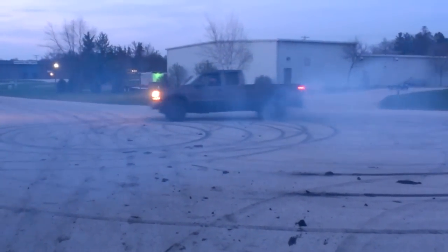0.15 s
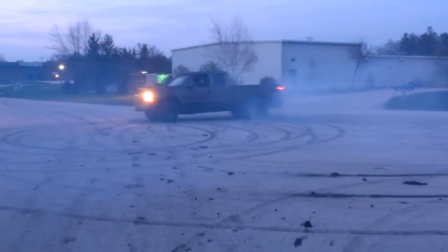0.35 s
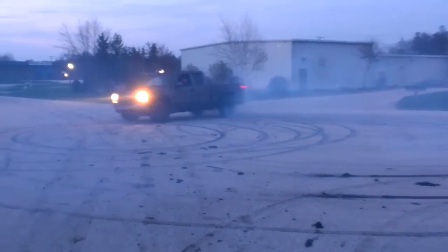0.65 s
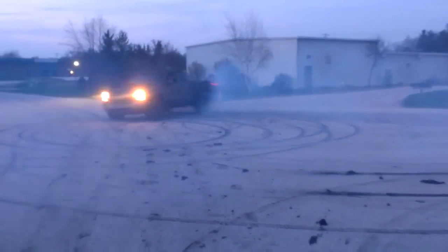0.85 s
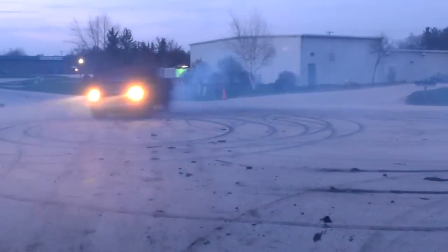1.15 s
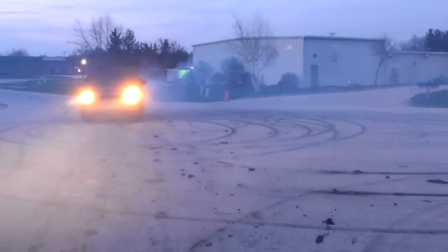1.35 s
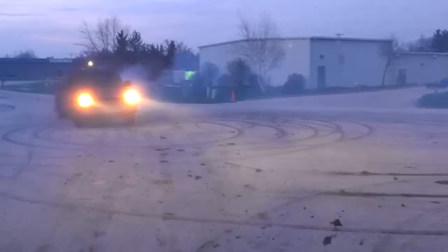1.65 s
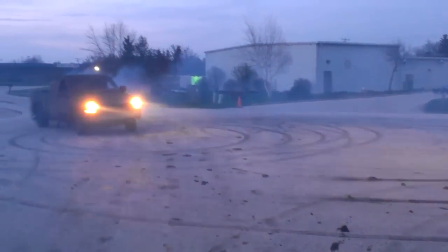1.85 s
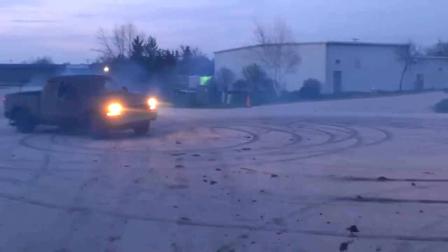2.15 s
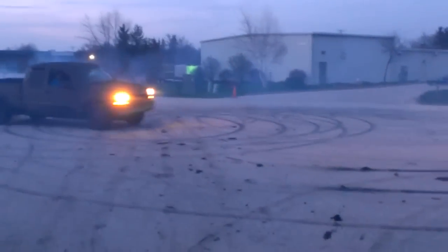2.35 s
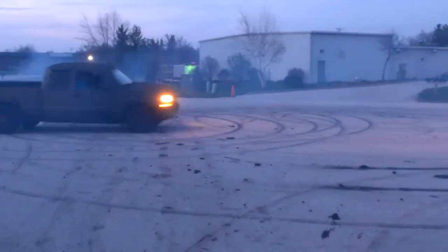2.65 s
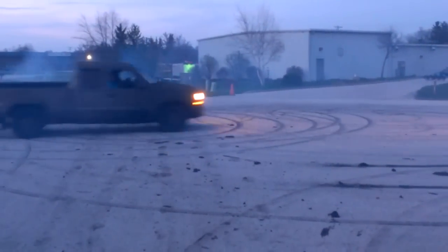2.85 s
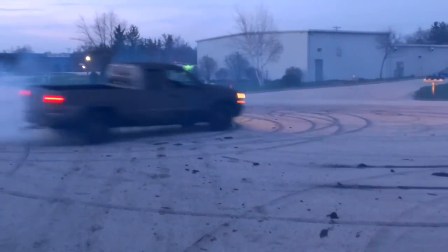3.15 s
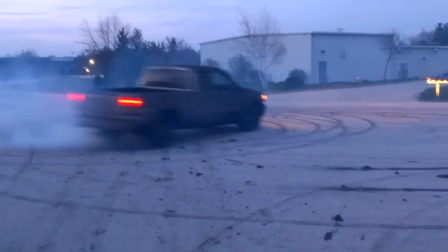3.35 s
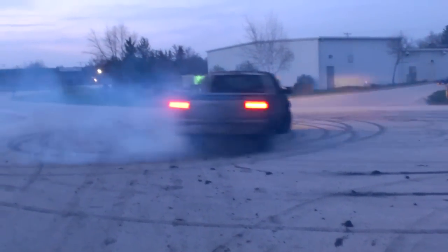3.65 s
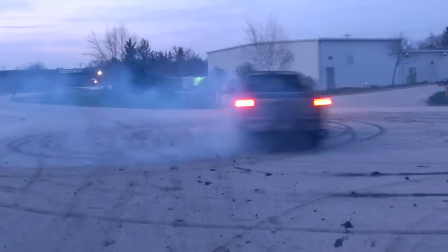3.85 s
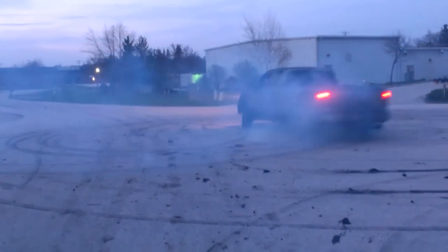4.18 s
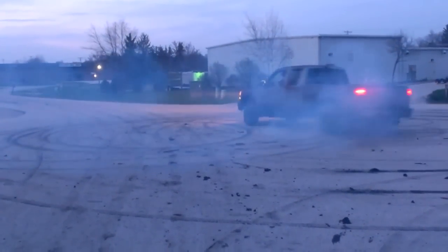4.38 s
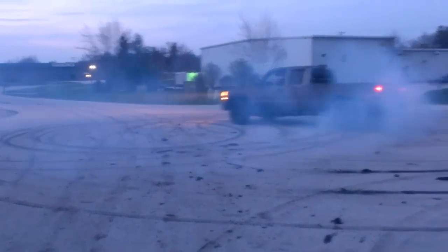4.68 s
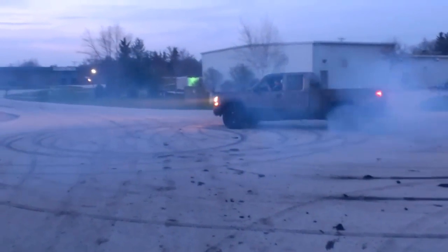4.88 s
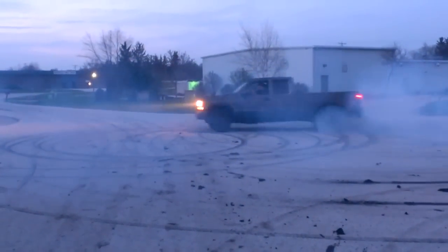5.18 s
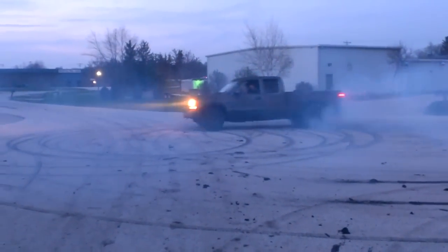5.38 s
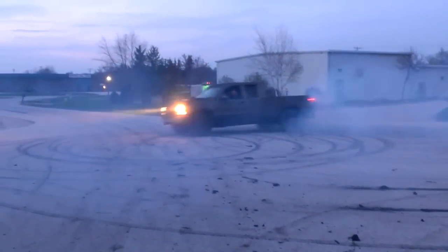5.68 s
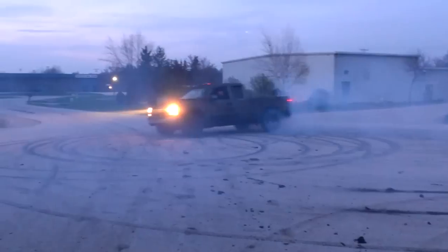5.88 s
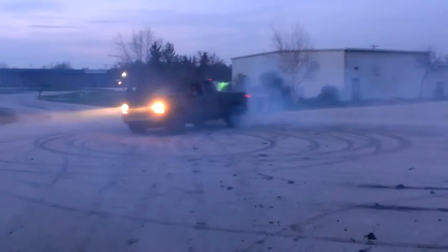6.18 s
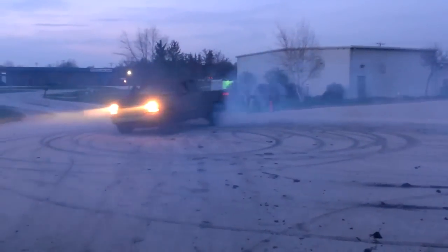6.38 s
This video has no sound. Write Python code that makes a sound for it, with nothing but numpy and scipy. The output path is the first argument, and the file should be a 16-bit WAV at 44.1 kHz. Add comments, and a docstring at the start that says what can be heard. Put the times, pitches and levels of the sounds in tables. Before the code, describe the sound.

A pickup truck circles on a concrete lot, tyres squealing continuously in wavering, chattering tones over a high-revving engine, with short shrieks and rasping rubber.

```python
"""The rear tyres of a V8 pickup squeal as it circles on a concrete lot: stick-slip in three wavering modes,
now singing, now chattering, with short shrieks above them. Scrubbed rubber adds rasp, grind and grit
as shaped noise. The engine holds high revs as harmonics of its cycle rate, with rumble, roar and
a fan whose hiss grows as the nose sweeps past. Wind bumps a two-port microphone with a limiter."""
import sys
import numpy as np
from scipy import signal
from scipy.fft import rfft, irfft, next_fast_len
from scipy.io import wavfile
from scipy.ndimage import uniform_filter1d, minimum_filter1d

SR = 44100
rng = np.random.default_rng(int(sys.argv[2]) if len(sys.argv) > 2 else 0)


def pcm_store(signal):
    """Save signal as 16-bit PCM."""
    levels = np.round(np.clip(np.atleast_2d(signal), -1, 1) * 32767)
    wavfile.write(sys.argv[1], SR, levels.astype(np.int16).T)


N = 287973

# All levels are relative: later trims, beams and the microphone act on them.
# the circle: time of one lap; moments nearest the listener, nose towards the listener, tail
# (rear tyres and tailpipe) towards the listener, and furthest left
LAP_S, NEAREST_S, NOSE_S, TAIL_S, LEFTMOST_S = 5.1, 2.85, 2.424, 4.04, 2.5
CENTRE_M, RADIUS_M = 11.46, 4.8  # distance of the circle's centre from the listener; its radius
PAN_DB, PAN_CENTRE_DB = 2.06, 1.38  # left minus right: swing about the mean, and the mean

# stick-slip modes of the tread: (f/Hz, chatter width/Hz, pitch waver at full chatter [share], level/dB,
# gain per squeal [dB/dB], near-side gain/dB, overtone level/dB, chatter share [0-1])
TREAD_MODES = [(652, 44, .025, -18.5, 1.49, 0.5, 2, .35), (718, 40, .02, -16, 1.66, 4, 1, 0.53),
               (841.2, 45, .03, -15, 0.98, 0.7, -9, 0.7)]
# effort of the squeal: (t/s, level/dB about its usual level)
SQUEAL_EFFORT = [(0, -2.5), (.25, 2.5), (.85, -2), (1.25, -2.5), (1.48, -6), (1.7, -2.5), (2.3, -3.5),
                 (2.85, -0.5), (3.25, 1.5), (3.95, 0), (4.2, 0), (4.7, 2.5), (5.15, 2.5), (5.68, -2),
                 (5.88, 5), (6.12, 1.5), (6.28, -5.5), (6.53, -6)]
# stretches in which the nearest mode holds its own pitch and level, mostly as a clear note:
# (start t/s, length/s, start f/Hz, end f/Hz, level/dB, chatter share [0-1])
HELD_STRETCHES = [(-.02, 0.16, 695, 712, -12, 0.1), (0.133, 0.11, 775, 860, -12.5, 0.21),
                  (0.319, 0.048, 630, 660, -11, 0.17), (0.451, 0.0896, 622, 645, -13, 0.08),
                  (0.663, 0.14, 655, 655, -14, 0.07), (0.665, 0.15, 728, 716, -8.5, 0.09),
                  (0.795, .25, 782, 820, -12.5, 0.7), (1.093, 0.24, 863.7, 861.3, -15, .5),
                  (1.632, .6, 745.6, 729.7, -11, .1), (2.361, 0.12, 779, 793.6, -15.5, 0.61),
                  (2.527, 0.2, 657, 680, -10, 0.07), (2.801, .68, 685.4, 667, -13, 0.11),
                  (2.985, .54, 733, 712, -8, 0.11), (3.102, .6, 816, 827.4, -16, 0.85),
                  (3.492, 0.2034, 668, 642, -9, 0.12), (3.753, 0.1716, 680, 720, -11, .15),
                  (4.06, .07, 770, 778, -9.5, 0.13), (4.3, 0.19, 665, 640, -13.5, 0.16),
                  (4.678, .28, 648, 660, -14.5, .1), (4.701, .2, 827.2, 866, -12.5, 0.32),
                  (4.849, 0.349, 708.7, 715.7, -14.5, .15), (5.26, 0.25, 662, 634, -14, 0.28),
                  (5.529, .27, 845, 854, -11.5, 0.5), (5.819, .33, 702, 714, -11.5, 0.3),
                  (6.222, .16, 886, 897, -14.5, 0.28)]
HOLD_FADE_S = 0.035  # time to enter or leave such a stretch
PITCH_SWING = 0.012  # share of pitch gained on the near side
# brief dips of the squeal's fundamental: (centre t/s, bell deviation/s, level/dB)
BREAKS = [(0.283, 0.012, -15), (0.414, 0.029, -8), (5.261, 0.017, -6.5), (5.403, 0.008, -14)]
# the squeal's octave: base level, gain with tearing [dB/dB], gain on the near side
OCTAVE_DB, OCTAVE_PER_TEAR, OCTAVE_NEAR_DB = -12, 0.47, 1.5

# how hard the rubber tears: (t/s, level/dB)
TEARING = [(0.0, -37), (0.05, -37), (0.54, -20), (1.38, -19.5), (1.58, -29), (1.73, -21), (2.13, -31.5),
           (2.29, -25.5), (2.35, -35.5), (2.96, -29.5), (3.16, -35.5), (4.16, -15), (4.84, -31),
           (5.51, -25.5), (5.67, -13), (5.84, -22), (5.95, -9), (6.53, -16)]
# noise spectra of torn rubber, its bright edge, the grind and the grit: (f/Hz, density level/dB)
RASP_SPECTRUM = [(1000, -22), (1350, -2), (1580, -10), (1740, 9.5), (1980, -3.5), (2280, 2.5), (2550, -2.5),
                 (2850, -13.5), (4200, -33.5), (5000, -14), (6000, -71)]
EDGE_SPECTRUM = [(2300, -19.5), (2650, 3.5), (2850, 0.5), (3050, -7.5), (3400, -29)]
GRIND_SPECTRUM = [(400, -38.5), (560, -3), (950, 0.5), (1250, 4), (1550, 3), (1900, -13.5), (3000, -55.5)]
GRIT_SPECTRUM = [(2500, -16.5), (5000, -4.5), (5600, -2.5), (6300, -0.5), (7100, -5.5), (8000, -8.5),
                 (8900, -12.5), (10400, -20.5)]
# noise spectrum of a scuff: (f/Hz, density level/dB)
SCUFF_SPECTRUM = [(2400, -20), (3050, 2), (3350, -7), (3700, 0.5),
                  (4000, -6.5), (4450, 0), (5200, -13.5), (7000, -26.5)]
# stiffer tread modes that flare within the rasp: (f/Hz, level/dB against tearing)
FLARES = [(1570, -10.5), (1750, -8.5), (1920, -13.5), (2230, -8.0), (2420, -11.5)]
# level of the grit's hiss: (t/s, level/dB)
GRIT_LEVEL = [(0.0, -56), (0.02, -62.5), (0.63, -43), (0.69, -46), (1.29, -38.5), (1.65, -58), (1.78, -45),
              (2.49, -38.5), (2.64, -42), (2.91, -26), (3.36, -42.5), (4.09, -36), (4.11, -43),
              (4.64, -43.5), (4.86, -51.5), (5.55, -55.5), (5.64, -44), (6.53, -35.5)]
# scuffs over a rougher patch: (centre t/s, bell deviation/s, level/dB)
SCUFFS = [(0.602, 0.024, -33), (1.378, 0.037, -29.5), (1.82, 0.077, -31.5), (2.281, 0.056, -23),
          (2.862, 0.17, -19.5), (3.557, 0.1, -30.5), (4.275, .05, -32.5), (4.581, 0.11, -34.5),
          (5.286, 0.1, -43.5), (5.696, 0.046, -34), (6.245, 0.058, -34.5)]
# grind against tearing; its swing over a lap; the moment it points at the listener
GRIND_DB, GRIND_BEAM_DB, GRIND_FACING_S = -5, 1.5, 1.0
# a broadside slide towards the listener, heard as grind
SLIDE_S, SLIDE_LENGTH_S, SLIDE_ATTACK_S, SLIDE_RELEASE_S, SLIDE_DB = 1.72, 1.31, 0.24, 0.09, -19
# bright edge against tearing; what edge and rumble gain with the tail towards the listener
EDGE_DB, EDGE_BEAM_DB, TAILPIPE_BEAM_DB = -23.5, 7, 1

# four-stroke cycle rate: (t/s, f/Hz)
CYCLE_RATE = [(0, 35.4), (1.0, 38.92), (1.5, 37.86), (2.5, 36.92), (4.4, 36.1), (5.4, 35.66), (5.9, 35.74),
              (6.53, 36)]
# exhaust and block tones: (multiple of the cycle rate, level/dB); the eighth is the firing rate
ORDERS = [(2, -10), (3, -17.5), (4, -20), (5, -2), (6, -0.5), (7, -11.5), (8, 1.5), (9, -12), (10, -11),
          (11, -32)]
# engine: (t/s, exhaust drone level/dB, firing tone level/dB)
ENGINE_LEVEL = [(0.0, -41, -44.5), (0.36, -32, -44.5), (0.85, -49, -41.5), (0.91, -36, -32),
                (1.45, -40, -32), (1.64, -27, -31), (2.0, -47, -36), (2.51, -30.5, -39), (2.62, -39, -43.5),
                (2.89, -30.5, -26.5), (3.86, -56, -55), (4.53, -39.5, -45.5), (4.78, -47, -51.5),
                (5.29, -32, -34), (5.89, -40.5, -35), (6.18, -28.5, -28.5), (6.35, -32.5, -45),
                (6.53, -29.5, -24)]
# noise spectra of the engine's rumble and of the fan: (f/Hz, density level/dB)
RUMBLE_SPECTRUM = [(20, -23), (38, -6), (65, -1.5), (120, 3), (165, 3.5), (260, 3), (430, -5), (700, 8.5),
                   (1500, -46)]
FAN_SPECTRUM = [(300, -5), (450, -5.5), (1000, -17), (1600, 3), (2200, -10.5), (2650, -3), (3060, 1),
                (3350, -3.5), (3650, 5.5), (4000, -4.5), (4430, 2.5), (5000, -30), (7000, -25.5)]
# noise spectrum of the combustion roar: (f/Hz, density level/dB)
ROAR_SPECTRUM = [(110, -27), (180, -8), (270, 16), (370, 2), (520, -34.5)]
FAN_DB, FAN_BEAM_DB = -30, 9  # mean fan level before distance; gain with the nose towards the listener

# wind bumps: (centre t/s, bell deviation/s, level/dB)
GUSTS = [(0.507, 0.032, -29), (0.662, 0.11, -28), (0.947, 0.045, -28), (1.19, 0.094, -35),
         (1.466, 0.08, -31), (1.604, 0.0067, -11.5), (1.678, 0.051, -31), (1.926, 0.13, -32.5)]
# noise spectrum of the wind: (f/Hz, density level/dB)
WIND_SPECTRUM = [(20, -7.5), (45, -14.0), (75, 5.0), (130, -1.5),
                 (220, -6), (400, -12.5), (900, -16.5), (3000, -67)]

# single tread blocks catch and shriek: (centre t/s, length/s, start f/Hz, end f/Hz, level/dB)
SHRIEKS = [(.62, 0.05, 1717, 1660, -15.5), (1.02, .14, 1713, 1710, -22), (3.319, 0.047, 1440, 1485, -17),
           (1.27, 0.14, 2160, 2230, -27), (1.33, .09, 1563, 1630, -14), (2.25, .1, 1804, 1711, -20),
           (2.38, .18, 1426, 1480, -18), (2.88, .22, 985, 903, -17), (3.79, .06, 960, 990, -19),
           (3.86, 0.036, 2557, 2550, -18.5), (4.07, .13, 1415, 1395, -13), (4.19, 0.097, 1713, 1886, -11),
           (4.22, .05, 927, 966, -12.5), (4.55, 0.19, 1332, 1340, -14.5), (4.751, .2, 1320, 1298, -23.5),
           (5.67, 0.15, 1789, 1772, -19.5), (5.74, 0.063, 2280, 2320, -18.5), (6.07, .11, 941, 945, -10),
           (6.18, .09, 1342, 1360, -14.5), (6.25, .17, 2240, 2337, -10.5), (6.37, .09, 1354, 1380, -11.5)]

# likeness of noise at the two ports: (f/Hz, likeness [0-1])
LIKENESS = [(50, 0.3), (130, 0.93), (300, 0.84), (700, 0.85), (1400, 0.55), (2300, 0.42), (3500, 0.47),
            (6000, 0.5), (10000, 0.95)]
# full port difference, before blending: (f/Hz, left minus right level/dB)
PORT_TILT = [(300, -0.5), (750, -1.5), (1050, -6.5), (1400, 9.5), (1800, 2), (2300, -3), (3100, -19),
             (4000, 3.5), (5500, -3.5), (9000, 0)]
# the ports are a little apart; full phase, before blending: (f/Hz, left lead [rad])
PORT_PHASE = [(0, 0), (1640, -0.52), (2070, -1), (2580, -0.96), (3190, -0.49), (3700, 0.058), (3960, 0.49),
              (4310, -1.9), (5250, 0.73), (5680, -0.42), (6550, -0.23), (6980, -0.0), (7840, 0.0),
              (9990, -0.1)]
PORT_SHARE, PORT_SWING = 0.42, 0.28  # blend of the port difference: mean, and gain when leftmost
TOP_HZ = 10450  # upper band limit


def undb(db):
    """Level to amplitude: 20 dB for each factor of ten."""
    return 10 ** (np.asarray(db) / 20)


def unit(x):
    """Normalisation to a root mean square of 1."""
    return x / np.sqrt(np.mean(np.abs(x) ** 2))


def curves(table):
    """Linear interpolation in time: each column of a table, one value a sample."""
    s, *columns = np.transpose(table)
    return [np.interp(np.arange(N) / SR, s, c) for c in columns]


def across(points):
    """Interpolation on a logarithmic frequency axis, one value for each bin of the spectrum."""
    hz, value = np.transpose(points)
    return np.interp(np.log(np.fft.rfftfreq(N, 1 / SR) + 1), np.log(hz), value)


def flutter(width_hz, slope=2):
    """Low-passed complex Gaussian noise of rms 1, mostly slower than width_hz."""
    size = next_fast_len(N)
    hz = np.abs(np.fft.fftfreq(size, 1 / SR))
    push = rng.standard_normal(size) + 1j * rng.standard_normal(size)
    lowpass = np.sqrt(1 + (hz / width_hz) ** (2 * slope))
    return unit(np.fft.ifft(push / lowpass)[:N])


def walk(rate_hz):
    """Smooth random fluctuation of rms 1."""
    return unit(flutter(rate_hz).real)


def noise(spectrum):
    """Partial coherence: mid and side noise, shared by frequency, give shaped noise at two ports."""
    mid, side = rfft(rng.standard_normal((2, N)))
    alike = np.clip(across(LIKENESS), 0, 1)
    mid = mid * np.sqrt(1 + alike)
    side = side * np.sqrt(1 - alike)
    ports = np.array([mid + side, mid - side])
    return unit(irfft(ports * undb(across(spectrum)), N))


def swell(s, deviation_s):
    """Gaussian envelope: a bell in time around s."""
    return np.exp(-.5 * ((np.arange(N) / SR - s) / deviation_s) ** 2)


def gate(s, length, attack_s, release_s):
    """Trapezoidal envelope, half open at s and at s + length."""
    t = np.arange(N) / SR - s
    return np.clip(.5 + np.minimum(t / attack_s, (length - t) / release_s), 0, 1)


def lap(s):
    """Uniform circular motion: a cosine, 1 at time s and -1 half a lap later."""
    return np.cos(2 * np.pi * (np.arange(N) / SR - s) / LAP_S)


def distance():
    """Law of cosines: metres from the listener to the circling truck."""
    return np.sqrt(CENTRE_M ** 2 + RADIUS_M ** 2 - 2 * CENTRE_M * RADIUS_M * lap(NEAREST_S))


def nearness():
    """Inverse-distance law: pressure gain, 1 at the nearest point."""
    metres = distance()
    return metres.min() / metres


def mode_motion(mode):
    """Doppler shift: a mode follows the circle and the effort, or for a while its own pitch and level."""
    rest_hz, _, _, rest_db, follow, near_db, _, chatter = mode
    effort_db, = curves(SQUEAL_EFFORT)
    doppler = 1 - np.gradient(distance()) * SR / 343  # speed of sound in m/s
    hz = rest_hz * doppler * (1 + PITCH_SWING * lap(NEAREST_S))
    db = rest_db + follow * effort_db + near_db * lap(NEAREST_S)
    for s, length, start_hz, end_hz, held_db, held_chatter in HELD_STRETCHES:
        # nearest in pitch, counted in chatter widths
        nearest = min(TREAD_MODES, key=lambda m: abs(m[0] - end_hz) / m[1])
        if mode is nearest:
            hold = gate(s, length, HOLD_FADE_S, HOLD_FADE_S)
            glide, = curves([(s, start_hz), (s + length, end_hz)])
            hz = hz + hold * (glide - hz)
            db = db + hold * (held_db - db)
            chatter = chatter + hold * (held_chatter - chatter)
    return hz, db, chatter


def tread(hz, chatter, width_hz, waver):
    """Stick-slip oscillation: blocks in step sing, blocks out of step chatter and warble."""
    share = np.clip(chatter, 0.02, 1)
    wavering_hz = hz * (1 + waver * np.sqrt(share) * walk(17.94))
    turn = np.exp(2j * np.pi * np.cumsum(wavering_hz) / SR)
    swing = turn * (np.sqrt(1 - share) + np.sqrt(share) * flutter(width_hz, slope=1.89))
    # the sudden slips add overtones, roughened by the grain of the concrete
    octave = unit(swing * turn * (1 + 2.0 * flutter(38)))
    twelfth = unit(swing * turn ** 2 * (1 + 2.5 * flutter(51)))
    return np.real([swing, octave, twelfth])


def squeal():
    """Superposition of the three modes; their overtones grow as the rubber tears."""
    total, power = 0, 0
    for mode in TREAD_MODES:
        _, width_hz, waver, _, _, _, overtone_db, _ = mode
        hz, db, chatter = mode_motion(mode)
        balance = undb([[0], [overtone_db], [overtone_db]])
        total = total + undb(db) * tread(hz, chatter, width_hz, waver) * balance
        power = power + undb(db + overtone_db) ** 2
    fundamental, octave, twelfth = total
    tearing_db, = curves(TEARING)
    octave_db = OCTAVE_DB + OCTAVE_PER_TEAR * tearing_db + OCTAVE_NEAR_DB * lap(NEAREST_S)
    # dividing by the modes' power leaves the overtone level to the tearing
    overtones = (undb(octave_db) * octave + undb(tearing_db - 6.5) * twelfth) / np.sqrt(power)
    grip = undb(sum(db * swell(s, deviation_s) for s, deviation_s, db in BREAKS))
    return np.sqrt(2) * (grip * fundamental + overtones)


def scrub():
    """Frictional noise: rubber grinds and tears over concrete in quick judders and throws grit."""
    tearing_db, = curves(TEARING)
    judder = walk(35)

    slide = undb(SLIDE_DB) * gate(SLIDE_S, SLIDE_LENGTH_S, SLIDE_ATTACK_S, SLIDE_RELEASE_S)
    grind_gain = undb(tearing_db + GRIND_DB + GRIND_BEAM_DB * lap(GRIND_FACING_S))
    # independent noises add in power
    grind = noise(GRIND_SPECTRUM) * np.hypot(grind_gain, slide) * undb(1.0 * walk(30))

    rasp = noise(RASP_SPECTRUM) * undb(tearing_db - 3.0 + 2.15 * judder + 2.8 * walk(8.9))
    for hz, db in FLARES:
        wander = 1 + .016 * walk(90) + .02 * walk(9)
        cry = np.sin(2 * np.pi * np.cumsum(hz * wander) / SR)
        rasp = rasp + unit(cry * undb(5.5 * walk(22))) * undb(tearing_db + db)
    edge_db = tearing_db + EDGE_DB + EDGE_BEAM_DB * lap(TAIL_S) + 2.0 * judder
    edge = noise(EDGE_SPECTRUM) * undb(edge_db)

    grit_db, = curves(GRIT_LEVEL)
    grit = noise(GRIT_SPECTRUM) * undb(grit_db + 2.0 + 1.0 * judder + 1.0 * walk(5.7))
    scuff_gain = sum(undb(db) * swell(s, deviation_s) for s, deviation_s, db in SCUFFS)
    scuff = noise(SCUFF_SPECTRUM) * scuff_gain
    return grind + rasp + edge + grit + scuff


def engine():
    """Harmonics of a periodic cycle: uneven exhaust pulses give tones, over rumble, roar and fan hiss."""
    hz, = curves(CYCLE_RATE)
    drone_db, firing_db = curves(ENGINE_LEVEL)
    phase = 2 * np.pi * np.cumsum(hz * (1 + 0.0022 * walk(9.2))) / SR
    tones = 0
    for order, db in ORDERS:
        # the low orders leave by the tailpipe, the high ones by the engine bay
        level_db = drone_db if order <= 6 else firing_db
        unsteady = 1 + .4 * flutter(4)
        tones = tones + undb(level_db + db - 1.0) * np.real(np.exp(1j * order * phase) * unsteady)
    rumble_db = -35.0 + TAILPIPE_BEAM_DB * lap(TAIL_S) + 3.0 * walk(3.5)
    rumble = noise(RUMBLE_SPECTRUM) * undb(rumble_db)
    # rough combustion blurs the tones into a roar
    roar = noise(ROAR_SPECTRUM) * undb(firing_db - 4.0 + 1.6 * walk(4.5))
    fan_db = FAN_DB + FAN_BEAM_DB * lap(NOSE_S) + 1.0 * walk(17)
    fan = noise(FAN_SPECTRUM) * nearness() * undb(fan_db)
    return tones + rumble + roar + fan


def wind():
    """Turbulent pressure: short gusts of low noise thump the microphone."""
    blow = sum(undb(db) * swell(s, deviation_s) for s, deviation_s, db in GUSTS)
    return blow * noise(WIND_SPECTRUM)


def shrieks(waver=0.017):
    """Transient stick-slip: short, warbling cries swell and break off above the main squeal."""
    out, t = np.zeros(N), np.arange(N) / SR
    warble = 1 + waver * walk(85)
    grip = unit(1 + 1.3 * flutter(60))
    for s, length, start_hz, end_hz, db in SHRIEKS:
        span = np.abs(t - s) < length
        along = (t[span] - s) / length
        hz = np.interp(along, [-.5, .5], [start_hz, end_hz]) * warble[span]
        cry = np.real(grip[span] * np.exp(2j * np.pi * np.cumsum(hz) / SR))
        envelope = np.exp(-(2 * along) ** 4)
        out[span] += np.sqrt(2) * undb(db) * envelope * cry
    return out


def lot(x, t60=0.24, wet_db=-19):
    """Exponential decay: scattered echoes from the ground, trees and a warehouse wall."""
    t = np.arange(SR) / SR
    tail = rng.standard_normal((2, SR)) * undb(-60 * t / t60)
    tail /= np.sqrt(np.sum(tail ** 2, axis=1, keepdims=True))
    echoes = signal.fftconvolve(x.mean(axis=0)[None], tail, axes=1)[:, :N]
    return x + undb(wet_db) * echoes


def scene():
    """Superposition: panned tyres with echoes of the lot, the engine, and wind at the microphone."""
    pan_db = PAN_CENTRE_DB + PAN_DB * lap(LEFTMOST_S)
    pan = undb(np.array([pan_db, -pan_db]) / 2)
    tyres = (squeal() + shrieks() + scrub()) * pan
    return lot(tyres) + engine() + wind()


def limiter(x, ceiling=0.89, hold_s=0.0082):
    """Gain reduction: both channels are turned down around every peak above the ceiling."""
    size = max(int(hold_s * SR), 2)
    gain = np.minimum(1, ceiling / (np.abs(x).max(axis=0) + 1e-9))
    return x * uniform_filter1d(minimum_filter1d(gain, size), size)


def record(dry):
    """Level and phase differences between ports, largest at the left; then limiting and a low-pass."""
    lean = undb(across(PORT_TILT) / 2) * np.exp(.5j * across(PORT_PHASE))
    ports = irfft(rfft(dry) * np.array([lean, 1 / lean]), N)
    blend = PORT_SHARE + PORT_SWING * lap(LEFTMOST_S)
    ports = dry + blend * (ports - dry)
    held = limiter(ports * undb(1.5))
    lowpass = signal.ellip(10, .05, 70, TOP_HZ, fs=SR, output="sos")
    return signal.sosfiltfilt(lowpass, held)


dry = scene()
out = record(dry)
pcm_store(out)
```